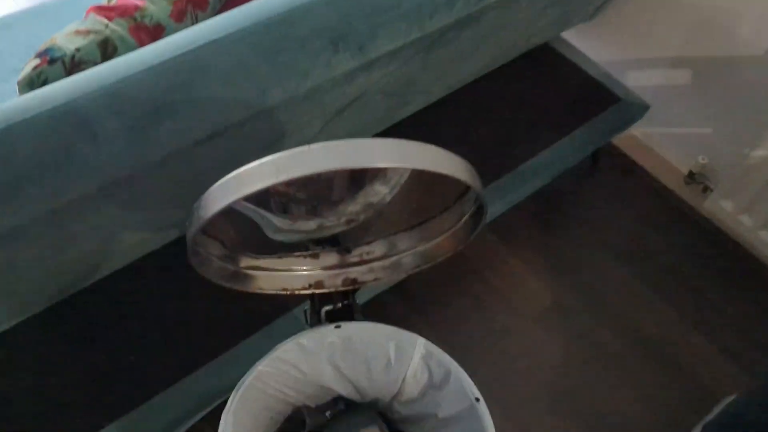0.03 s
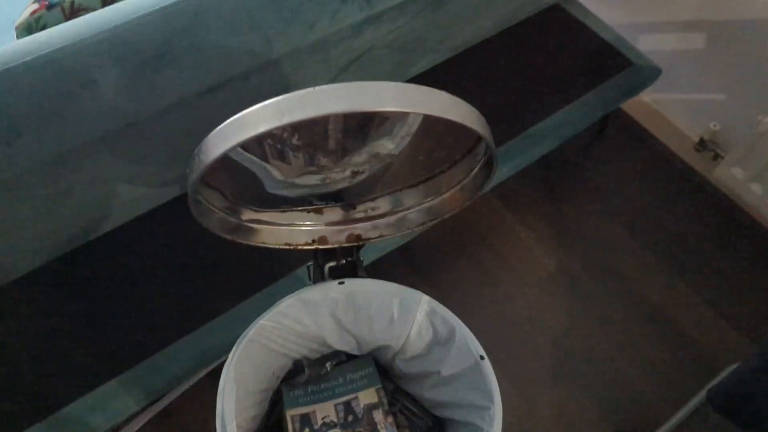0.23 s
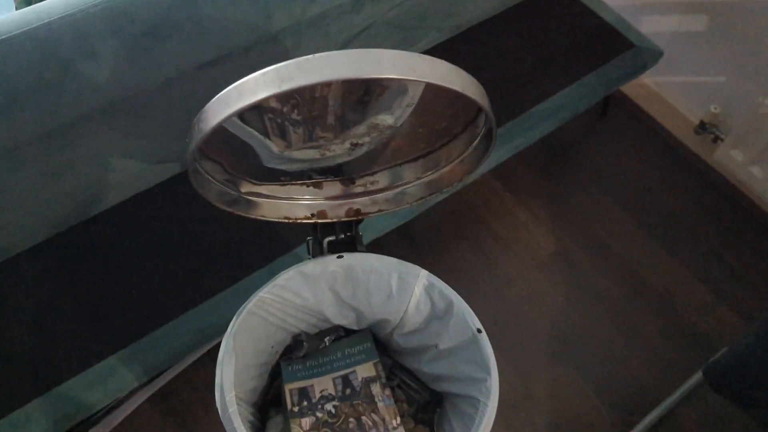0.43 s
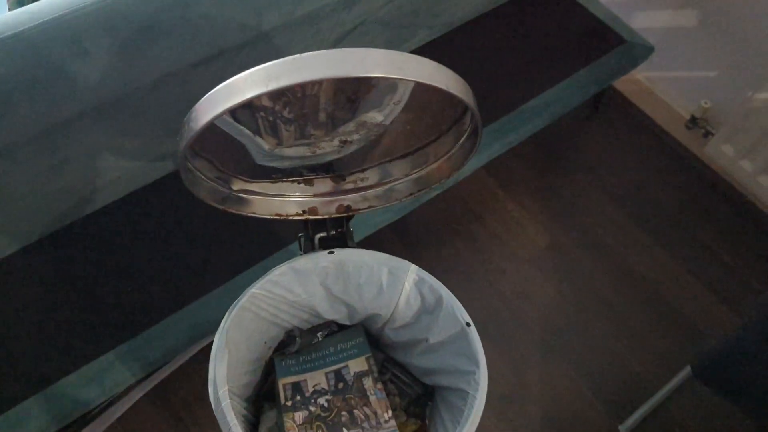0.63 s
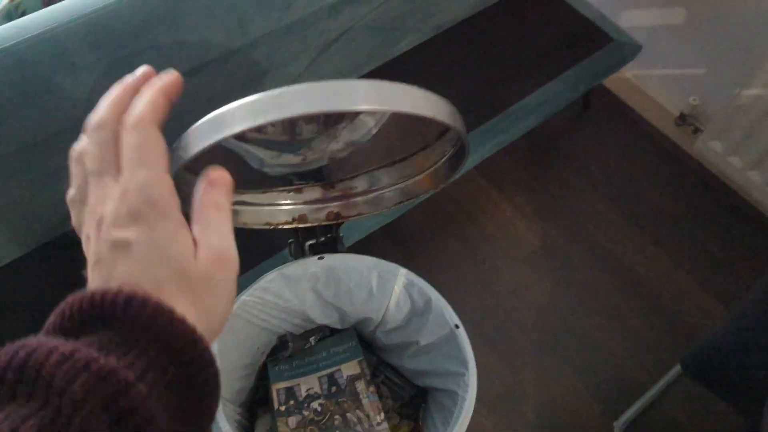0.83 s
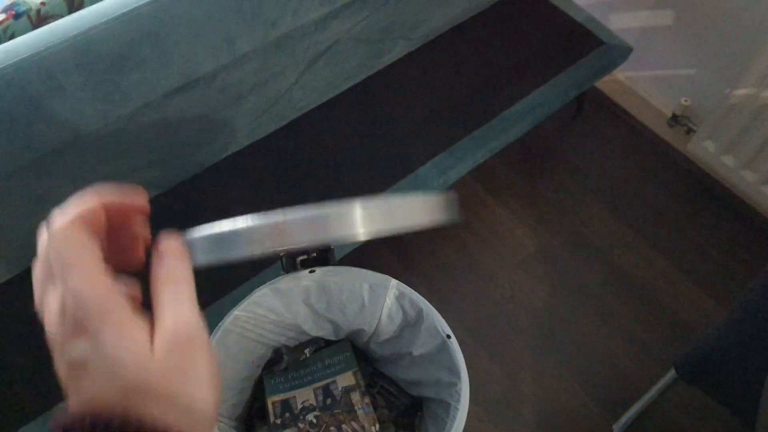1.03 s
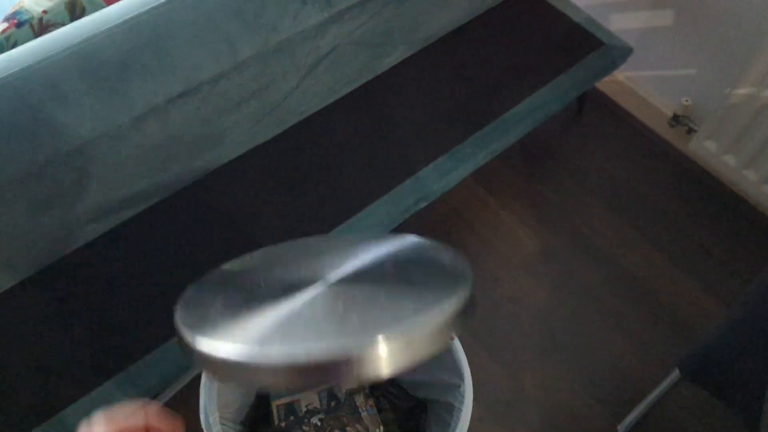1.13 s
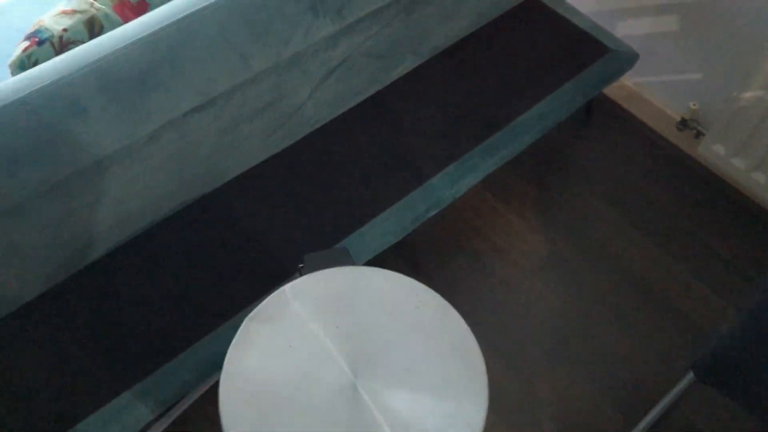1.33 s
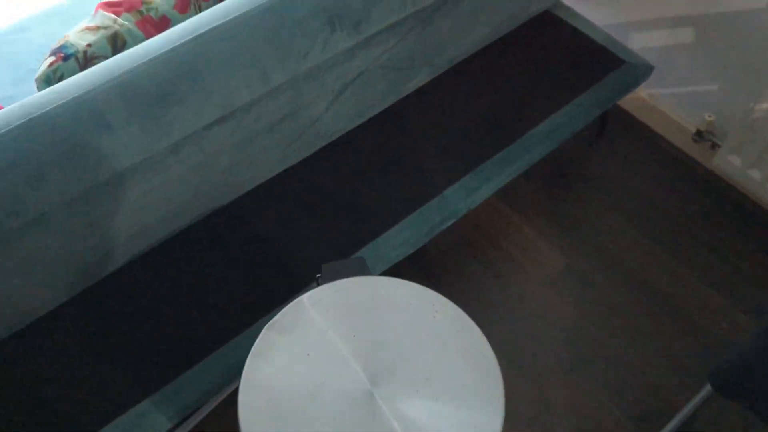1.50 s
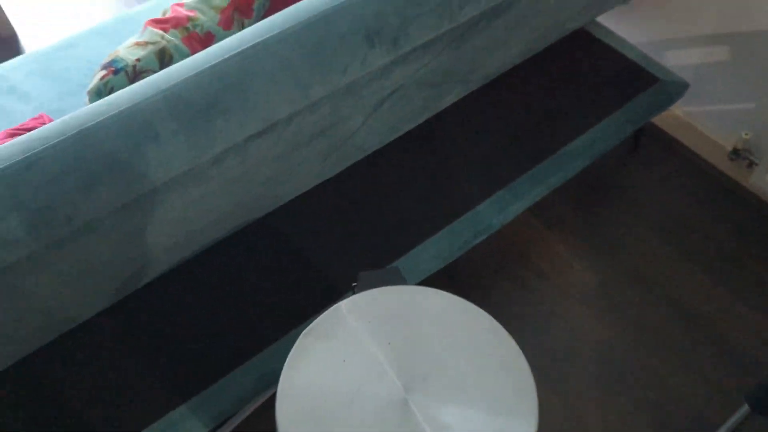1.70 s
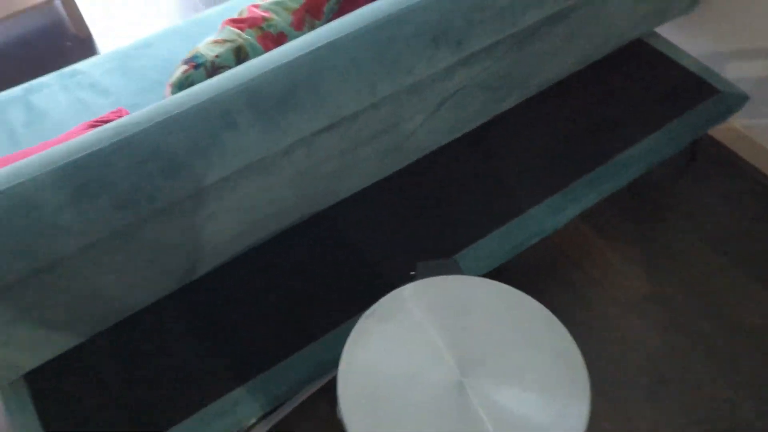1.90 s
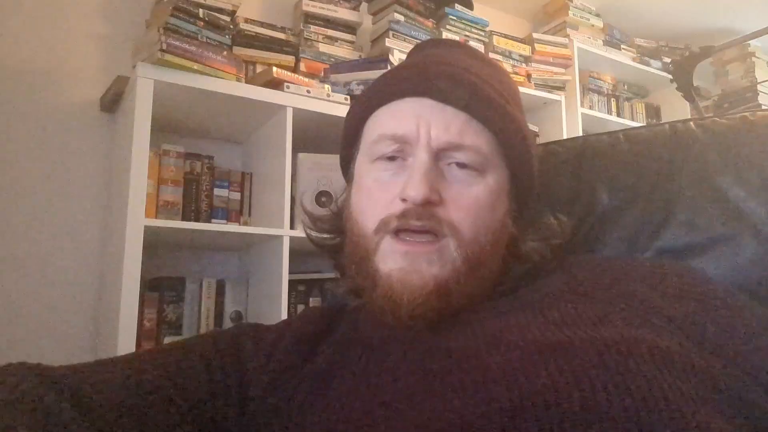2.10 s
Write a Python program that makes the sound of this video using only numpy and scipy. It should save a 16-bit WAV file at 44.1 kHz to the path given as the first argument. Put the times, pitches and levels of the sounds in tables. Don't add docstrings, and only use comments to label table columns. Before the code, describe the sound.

A book lands in a lined metal pedal bin with a sharp, clattering bang and brief bag crackle; quiet pedal clicks and scraping follow, then the lid slams heavily and rings in a small room, close stereo microphone.

```python
import sys
import numpy as np
from scipy import signal
from scipy.fft import rfft, irfft
from scipy.io import wavfile
from scipy.ndimage import uniform_filter1d

SR = 44100
rng = np.random.default_rng(int(sys.argv[2]) if len(sys.argv) > 2 else 0)


def waveform_to_disk(signal):
    frames = np.transpose(np.atleast_2d(signal))
    scaled = np.clip(frames, -1, 1) * 32767
    samples = np.round(scaled).astype(np.int16)
    wavfile.write(sys.argv[1], SR, samples)


def invert_db(x):
    u = np.asarray(x, float) / 20
    return 10 ** u


N = 94815

# (time [s], knock [dB], thud [dB], tick [dB])
BOOK_BLOWS = [(.003, -16, -17, -55), (.026, -54, -31.5, -50), (.038, -14, -28, -26.5),
              (.043, -15.5, -14, -17), (.058, -24, -21, -32), (.065, -25, -25.5, -22.5),
              (.098, -32, -34.5, -27), (.119, -42, -39.5, -21.5), (.137, -28, -43.5, -28),
              (.167, -44, -27.5, -54.5), (.255, -44, -33, -49), (.205, -53, -54.5, -33),
              (.347, -47.5, -37.5, -64.5), (.411, -52.5, -63, -68), (.452, -62.5, -51, -68)]
CONTACT_DECAY = .004, 0.0033, 0.0015
# (pitch [Hz], level [dB], time to fall 60 dB [s])
BIN_BODY = [(93, -15.5, .08), (175.7, 0, 0.11), (230, -2, .06), (272, -4.5, 0.16), (381, 1.5, .056),
            (434, 2, 0.049), (550, -1.5, .08)]
# (frequency [Hz], level [dB per Hz])
BIN_WALL = [(290, -26), (500, -10.5), (1290, -2), (1490, -6), (2560, -5), (3720, -23.5), (6000, -23),
            (7800, -45.5), (13200, -120)]
# (frequency [Hz], level [dB per Hz])
TICK_TONE = [(3000, -41.5), (5000, -5.5), (6300, -9), (7800, -4.5), (10500, -10), (12000, -12),
             (16400, -20)]
# (time [s], level [dB])
BAG_LEVEL = [(0, -35), (.03, -36.5), (.045, -27.5), (.15, -46.5), (.22, -50), (.45, -80.5)]
# (frequency [Hz], level [dB per Hz])
BAG_TONE = [(300, -2.5), (1500, -1), (3000, 1), (4200, -10.5), (9000, -14.5), (16000, -19.5)]
# (time [s], level [dB], pitch [Hz], time to fall 60 dB [s])
THUMPS = [(.002, -3, 421, 0.017), (0.019, -19, 104, 0.074), (.040, -11, 230, 0.089),
          (0.067, -18, 253, 0.06), (0.093, -21.5, 230, 0.067), (.110, -28, 277, 0.084),
          (0.142, -25, 272, .1), (0.163, -26.5, 135, 0.054), (.226, -34, 265, 0.062),
          (0.249, -41.5, 135, 0.13), (0.344, -44, 274, 0.17), (0.379, -45, 288, 0.13),
          (0.515, -57, 142.8, 0.089), (0.549, -60.5, 140.5, .1), (1.320, -25.5, 70, 0.19),
          (1.321, -27.5, 298, 0.069), (1.337, -29.5, 190, 0.15), (1.601, -53.5, 110.7, 0.23),
          (1.70, -58, 64, 0.26), (1.781, -61, 140, 0.43)]
# (time [s], level [dB], pitch [Hz])
TAPS = [(0.064, -28, 1852), (.142, -30, 1660), (.396, -53.5, 1828), (0.396, -61, 2600), (.400, -57, 593),
        (0.409, -72, 4170), (.445, -71, 2184), (0.448, -71, 8500), (0.552, -67.5, 2040), (.556, -71, 1094),
        (.558, -81, 4510), (0.727, -67.5, 2317), (.762, -54, 1660), (0.804, -52.5, 1770),
        (0.826, -53.5, 1950), (.842, -65, 1600), (0.849, -57, 5060), (1.045, -65.5, 550),
        (1.190, -59, 1784), (1.255, -58, 4840), (1.308, -42, 4890), (1.317, -40.5, 4940),
        (1.667, -58, 2100), (1.814, -56, 376), (1.837, -61.5, 150)]
# (time [s], knock [dB], thud [dB], tick [dB])
PEDAL_BLOWS = [(0.726, -66, -53.5, -84.5), (0.76, -50, -53, -76.5), (.776, -52, -44, -58),
               (0.79, -50.5, -72, -49.5), (0.814, -43.5, -59.5, -52.5), (.851, -81.5, -78.5, -36),
               (0.861, -61.5, -59.5, -35), (1.039, -63.5, -61, -86.5), (1.057, -58.5, -54, -96),
               (1.173, -63.5, -81, -93), (1.193, -53, -54, -82.5), (1.249, -67, -61, -48),
               (1.283, -46.5, -35.5, -83.5)]
# (time [s], level [dB])
SCRAPE_LEVEL = [(.71, -80.5), (.76, -62.5), (.81, -49.5), (.885, -51), (.90, -54.5), (.97, -62.5)]
# (frequency [Hz], level [dB per Hz])
SCRAPE_TONE = [(60, -24), (260, -6), (450, -2), (900, -8), (1750, 0), (2800, -5.5), (3700, -12.5),
               (6000, -13), (8000, -23), (16000, -53.5)]
# (time [s], level [dB])
SWING_LEVEL = [(1.182, -75), (1.198, -59), (1.24, -61), (1.28, -57), (1.298, -48.5)]
# (frequency [Hz], level [dB per Hz])
SWING_TONE = [(100, -11), (400, -4), (900, -3), (1900, -0.5), (2900, -7), (3700, -16), (5000, -17.5),
              (8000, -34)]
# (time [s], knock [dB], thud [dB], tick [dB])
SLAM_BLOWS = [
    (1.3015, -27, -19, -31),
    (1.308, -29, -17.5, -32),
    (1.320, -26.5, -20.5, -57),
    (1.330, -38, -18.5, -44),
    (1.341, -33, -17.5, -51),
    (1.385, -55, -24, -80),
]
# (pitch [Hz], level [dB], time to fall 60 dB [s])
LID_RING = [(436, -16, 0.4), (579, -11.5, 0.66), (770, -0.5, 0.37), (972, -11, 0.81), (1061, -11, 0.75),
            (1213, -8, 0.64), (1576, -15.5, 0.84), (710, -14, 1.27), (1750, -17, 1.6), (1782, -14.5, 1.68),
            (1976, -13, 1.2), (2095, -11, .75), (2285, -20, 1.2), (2590, -12, 0.81)]
# (pitch [Hz], level [dB], time to fall 60 dB [s])
LID_BODY = [(42.8, -10, 0.59), (69.6, -23, 0.35), (89, 0.5, .25), (135, -19, 0.49), (172.2, -2.5, 0.39),
            (223.6, -5, 0.31), (274.6, -6.5, 0.13), (367, -2, 0.2), (398.4, -10, 0.92), (436.5, -2.5, 0.32),
            (556, -6.5, 0.17)]
# (frequency [Hz], level [dB per Hz])
LID_WALL = [(300, -2.5), (550, -0.5), (1100, 1), (2800, -5.5), (3700, -13), (5000, -11), (9000, -18),
            (16000, -35)]
# (time [s], level [dB])
RATTLE_LEVEL = [(1.3005, -33.5), (1.312, -32.5), (1.33, -38.5), (1.36, -42), (1.56, -67)]
# (frequency [Hz], time to fall 60 dB [s])
ROOM_T60 = [(60, 0.31), (250, 0.55), (1000, .5), (3000, 0.47), (8000, 0.22), (14000, 0.19)]
# (frequency [Hz], level against direct sound [dB])
ROOM_TONE = [(60, -2.5), (250, -3.5), (1000, -7), (3000, -10), (8000, -4), (14000, -5)]
# (frequency [Hz], level [dB per Hz])
AIR_TONE = [(25, -15.5), (50, -5.5), (80, 2), (150, -3.5), (300, -12), (1200, -25.5), (2500, -30.5),
            (3700, -32), (16000, -40.5)]
# (frequency [Hz], level [dB per Hz])
NEXT_AIR_TONE = [(15, -33.5), (25, 1), (293, -14), (394, -1.5), (516, -19), (734, -16.5), (1100, -24),
                 (16000, -50.5)]
# (frequency [Hz], side against mid [dB])
STEREO_WIDTH = [(60, -21), (180, -23), (350, -18), (700, -9), (1400, -6), (2800, -2), (5000, 0)]
# (frequency [Hz], left minus right [dB])
STEREO_LEAN = [(400, -.8), (700, -2), (1400, -6), (2800, -5.5), (5600, -2), (10000, 1), (14000, -2)]

CUT_S, RESUME_S = 1.9631, 2.062


def evened(x):
    return x / np.sqrt(np.mean(x ** 2) + 1e-20)


def unit(h):
    return h / np.linalg.norm(h)


def read(points, hz):
    f, value = np.transpose(points)
    return np.interp(np.log(hz + 1), np.log(f + 1), value)


def colour(points):
    hz = abs(np.fft.fftfreq(8192, 1 / SR))
    log_gain = np.log(invert_db(read(points, hz)))
    phase = -signal.hilbert(log_gain).imag
    return unit(np.fft.ifft(np.exp(log_gain + 1j * phase)).real[:4096])


def ring(modes):
    t = np.arange(40000) / SR
    total = np.zeros(len(t))
    for hz, db, t60 in modes:
        pair = np.sin(2 * np.pi * hz * t) + 0.4 * np.sin(2 * np.pi * hz * 1.009 * t)
        total += invert_db(db - 60 * t / t60) * pair
    return unit(total)


def wall(points, blur_db, t60, count=200):
    place, weakness, life = rng.random((count, 3)).T
    hz = 300 + 3300 * (np.arange(count) + place) / count
    level = read(points, hz) - 10 * weakness
    crowd = ring(zip(hz, level, t60 * (0.61 + life) * (1000 / hz) ** 0.16))
    crack = np.pad(colour(points), (0, len(crowd) - 4096))
    return unit(crack + invert_db(blur_db) * crowd)


def hits(blows, shell, body):
    drive = np.zeros((3, 2, N + 2000))
    t = np.arange(1500) / SR
    noise = rng.standard_normal((len(blows), 3, 2, 1500))
    for (start, *levels), burst in zip(blows, noise):
        at = round(start * SR)
        for k, decay in enumerate(CONTACT_DECAY):
            shape = np.minimum(t / decay / 0.36, 1) * np.exp(-t / decay)
            drive[k, :, at:at + 1500] += invert_db(levels[k]) * burst[k] * shape
    parts = zip(drive, (shell, body, colour(TICK_TONE)))
    return sum(signal.fftconvolve(push, part[None], axes=1)[:, :N] for push, part in parts)


def slips(curve, tone):
    slips_per_s, spread_db = 4000, 2.5
    t = np.arange(N) / SR
    level = invert_db(np.interp(t, *np.transpose(curve), left=-120, right=-120))
    size = invert_db(spread_db * np.minimum(rng.exponential(1, (2, N)), 4))
    sign = rng.choice([-1, 1], (2, N))
    happens = rng.random(N) < slips_per_s / SR
    grains = size * sign * happens
    return level * evened(signal.fftconvolve(grains, colour(tone)[None], axes=1)[:, :N])


def air(points, db):
    frames, hz = N // 256 + 5, np.fft.rfftfreq(1024, 1 / SR)
    a, b, c, d, patches = rng.standard_normal((frames, 513, 5)).T
    patches = evened(uniform_filter1d(uniform_filter1d(patches, 10, 0), 8, 1))
    z = np.array([a + 1j * b, c + 1j * d]) * invert_db(read(points, hz)[:, None] + 2 * patches)
    return invert_db(db) * evened(signal.istft(z, nperseg=1024, noverlap=768)[1][:, :N])


def bag():
    return slips(BAG_LEVEL, BAG_TONE)


def thumps():
    rise_s = 0.0035
    t = np.arange(N) / SR
    total = np.zeros(N)
    for start, db, hz, t60 in THUMPS:
        u = np.maximum(t - start, 0)
        swell = 1 - np.exp(-u / rise_s)
        total += invert_db(db - 60 * u / t60) * swell * np.sin(2 * np.pi * hz * u)
    return total * np.array([[1], [0.6]])


def room(x):
    clicks = np.zeros((2, SR))
    at = np.arange(200, SR - 20, 20) + rng.integers(0, 20, (2, (SR - 201) // 20))
    np.put_along_axis(clicks, at, rng.choice([-1., 1.], at.shape), 1)
    hz, t, z = signal.stft(clicks, SR, nperseg=512)
    t60 = read(ROOM_T60, hz)[:, None]
    fade = invert_db(read(ROOM_TONE, hz)[:, None] - 60 * t / t60)
    fade = fade / np.sqrt(t60 * SR / 276)
    tail = signal.istft(z * fade, SR, nperseg=512)[1]
    return signal.fftconvolve(x[:1], tail, axes=1)[:, :N]


def spread(pair):
    hz = np.fft.rfftfreq(pair.shape[1], 1 / SR)
    mid, side = rfft(pair)
    side = side * invert_db(read(STEREO_WIDTH, hz))
    lean = invert_db(read(STEREO_LEAN, hz) / 2)
    return irfft(np.array([(mid + side) * lean, (mid - side) / lean]), pair.shape[1])


def taps():
    swell_s, width = 0.0031, 0.39
    out, t = np.zeros((2, N)), np.arange(2500) / SR
    shape = np.e * t / swell_s * np.exp(-t / swell_s)
    for (start, db, hz), noise in zip(TAPS, rng.standard_normal((len(TAPS), 2, len(t)))):
        edges = [hz * (1 - width / 2), hz * (1 + width / 2)]
        band = signal.butter(2, edges, "band", fs=SR, output="sos")
        out[:, round(start * SR):][:, :len(t)] += invert_db(db) * evened(signal.sosfilt(band, noise)) * shape
    return out


def scrape():
    return slips(SCRAPE_LEVEL, SCRAPE_TONE)


def swing():
    return slips(SWING_LEVEL, SWING_TONE)


def slam():
    sheet = wall(LID_WALL, blur_db=15.5, t60=0.87)
    body = unit(ring(LID_BODY) + invert_db(-12) * ring(LID_RING))
    return hits(SLAM_BLOWS, sheet, body) + slips(RATTLE_LEVEL, LID_WALL)


def scene_change(t):
    since = t - 1.9616
    pop = invert_db(-24.5) * np.exp(-.5 * (since / 0.0002) ** 2)
    step = invert_db(-38) * np.clip((since - .0004) / .001, 0, 1) * (t < CUT_S)
    left = invert_db(-51) * np.sin(2 * np.pi * 1300 * since) * (abs(since - .0005) < .001)
    u = np.maximum(t - RESUME_S, 0)
    thump = invert_db(-61) * np.sin(2 * np.pi * 71 * u) * np.exp(-u / 0.012)
    return np.array([left, pop + step]) + thump


def scene():
    t = np.arange(N) / SR
    bin_shell, bin_body = wall(BIN_WALL, blur_db=-14.5, t60=0.1), ring(BIN_BODY)
    book = hits(BOOK_BLOWS, bin_shell, bin_body)
    pedal = hits(PEDAL_BLOWS, bin_shell, bin_body)
    near = book + bag() + taps() + pedal + scrape() + swing() + slam()
    low = thumps()
    echo = room(near + invert_db(-8) * low)
    shot = spread(near + low + echo + air(AIR_TONE, -70))
    low_cut = signal.butter(3, 42, "high", fs=SR, output="sos")
    shot = signal.sosfilt(low_cut, shot) * (t < CUT_S)
    fade_in = np.clip((t - RESUME_S) / 0.0029, 0, 1)
    return shot + spread(air(NEXT_AIR_TONE, -76.5)) * fade_in + scene_change(t)


def roll_off(x):
    return signal.sosfilt(signal.butter(12, 16540, fs=SR, output="sos"), x)


def record(dry):
    low_pass = signal.firwin(255, 16300, window=("kaiser", 8), fs=SR)
    mix = signal.oaconvolve(dry, low_pass[None], "same")
    return roll_off(mix)


dry = scene()
out = record(dry)
waveform_to_disk(out)
```